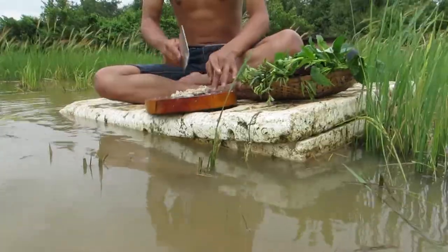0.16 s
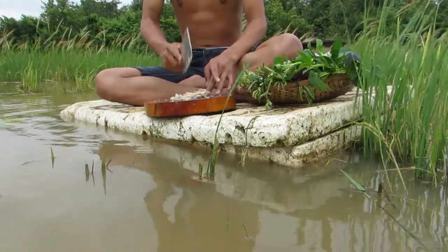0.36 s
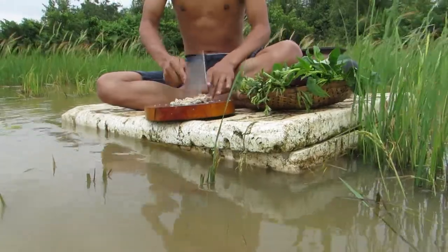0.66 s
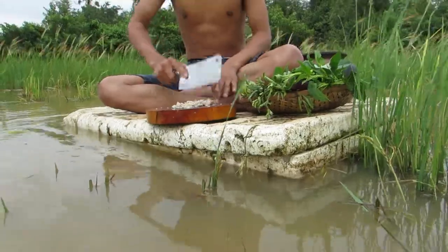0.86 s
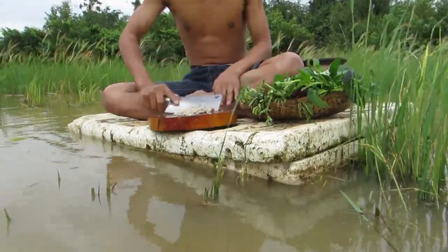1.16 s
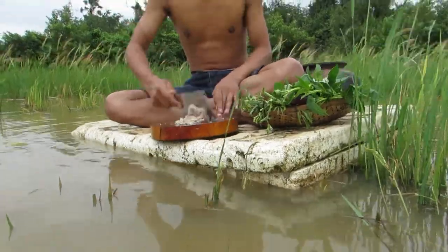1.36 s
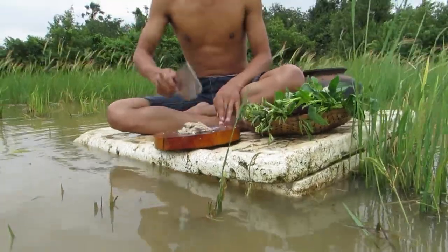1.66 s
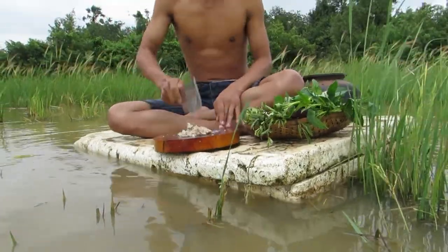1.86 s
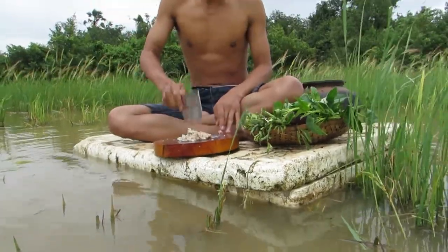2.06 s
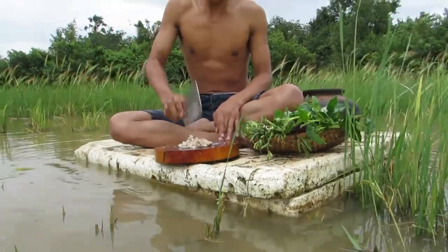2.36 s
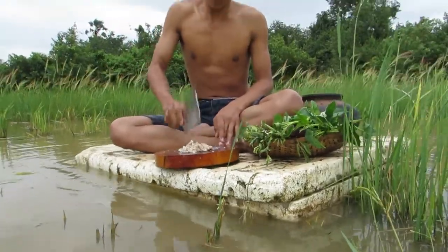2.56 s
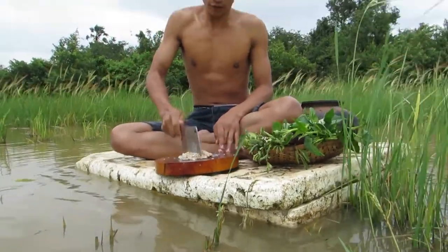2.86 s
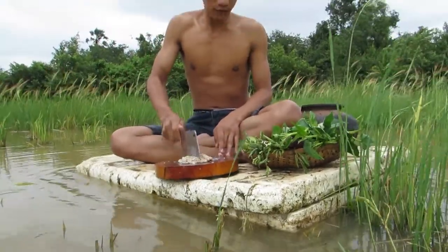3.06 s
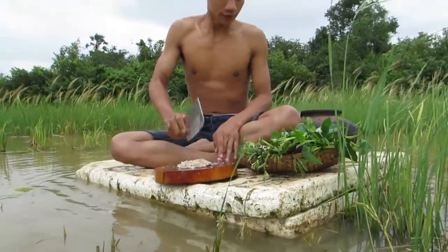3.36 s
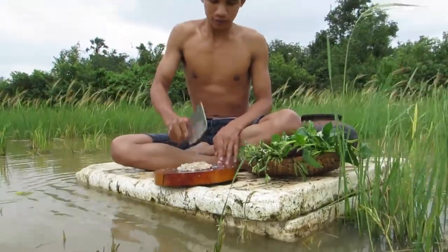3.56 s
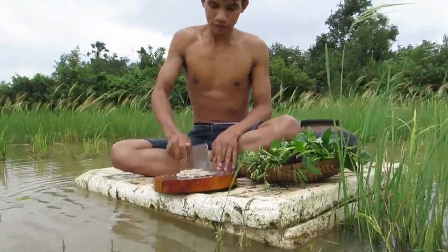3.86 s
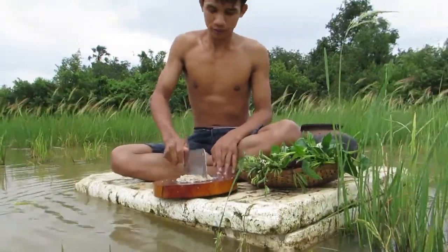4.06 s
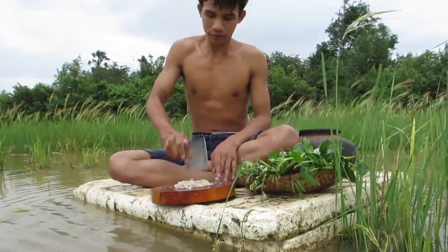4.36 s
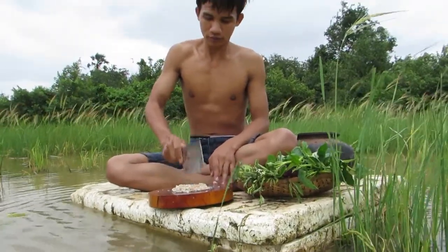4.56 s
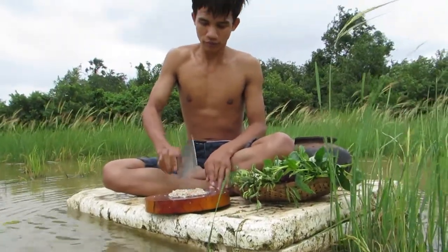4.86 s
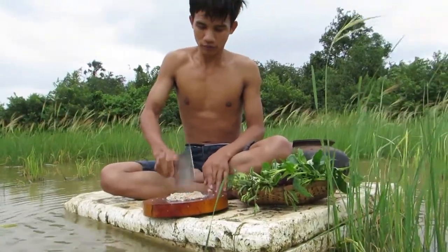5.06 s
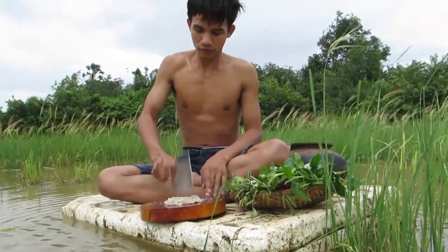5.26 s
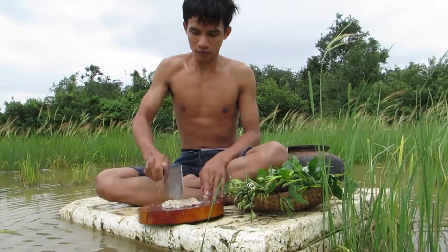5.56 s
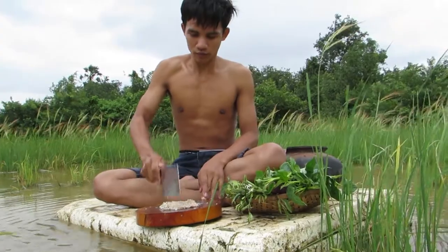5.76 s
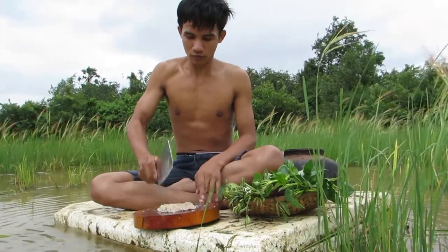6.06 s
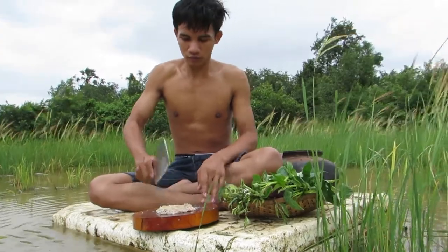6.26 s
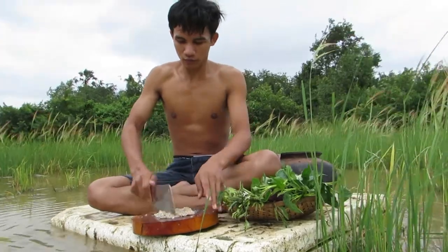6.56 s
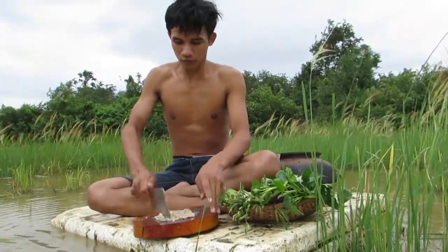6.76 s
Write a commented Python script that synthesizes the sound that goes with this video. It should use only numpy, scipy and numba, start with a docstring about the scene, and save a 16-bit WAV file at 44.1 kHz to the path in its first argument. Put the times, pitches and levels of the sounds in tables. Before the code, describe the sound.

Outdoors at a reedy pond, a small stereo camera a few metres away hears a cleaver on a wooden block. Four blows fall from 0 to 0.7 s, each a short woody knock with a bright crack, faint food crunch and low hollow thump from the foam raft. At about 1 s the blade scoops with a gritty clatter and drags briefly, hissing with a slight steel ring. Faint ticks and four raspy cricket chirps come around 1.4-1.6 s, then a soft scoop at 1.77 s. From 2 s chopping continues to the end, nearly five blows a second, varying in force, hardest near 2.4 s and generally lighter after 5 s. Low wind buffets, strongest around 2.5-3.4 s, with reed hiss, hollow drone, distant engine hum and a very thin high whine. Automatic gain ducks at hard, clipped hits and lifts the background in gaps.

```python
"""A reedy pond, a small camera's two microphone ports a few metres from a wooden block on a foam raft.
Four cleaver blows ring block and raft; from 1 s blade scoops food and drags; ticks and a cricket follow.
Chopping returns at 2 s and runs to the end. Noise bands make wind on the ports, reeds and a hollow drone;
wavering tones make a far engine and a thin high whine. Wind is strongest at 2.5-3.4 s, weaker after 5 s.
Gain control drops at hard blows and creeps back, so the background swells whenever the chopping eases."""
import sys
import numpy as np
from scipy import signal
from scipy.io import wavfile
from scipy.ndimage import uniform_filter1d
from numba import njit

SR = 44100
rng = np.random.default_rng(int(sys.argv[2]) if len(sys.argv) > 2 else 0)


def materialize(psi):
    """Save the field psi as 16-bit PCM at rate SR to the path in sys.argv[1].

    A 1-D psi becomes a single channel; in a 2-D psi each row is a channel.
    """
    bounded = np.clip(np.atleast_2d(psi).T, -1, 1)
    quanta = np.round(bounded * 32767).astype(np.int16)
    wavfile.write(sys.argv[1], SR, quanta)


N = 304731  # length in samples

# All levels stand ahead of the gain control; "side" is left minus right.
# Cleaver blows [t/s, level/dB, then against the block's main ring: raft/dB, knock/dB, upper ring/dB]
BLOWS = [(0.005, -11.5, -5, -8, -15.5), (0.2341, -11.5, -9, -7, -16), (0.453, -4.5, -21.5, -8.5, -14.5),
         (0.684, -14.5, -6.5, -12.5, -12), (1.9847, -7.5, -10.5, -11.5, -8.5),
         (2.2028, -12, -7.5, -14.5, -9.5), (2.4113, -1, -21, -14.5, -13.5), (2.6163, -23, -6, -9, -19),
         (2.8156, -3.5, -17, -11.5, -14.5), (3.0301, -8, -15.5, -21.5, -17), (3.2419, -19, -5, -15.5, -7.5),
         (3.4526, -7.5, -16.5, -16, -19.5), (3.6583, -8.5, -11, -16, -13.5), (3.8634, -4, -15.5, -19, -14),
         (4.0742, -15, -11, -11.5, -16), (4.2849, -23, -1.5, -10, -9), (4.495, -10.5, -8, -15.5, -12),
         (4.6995, -8.5, -12, -19, -11.5), (4.9079, -7.5, -12, -19, -15.5), (5.113, -14, -7, -11, -11),
         (5.318, -9, -13, -18, -12), (5.5162, -18.5, -9.5, -13, -17.5), (5.7245, -13, -15.5, -17, -16),
         (5.9384, -14.5, -16.5, -14, -13.5), (6.1515, -14, -17, -16, -12.5), (6.3673, -20, -15.5, -18, -11),
         (6.5812, -14, -28, -17, -14), (6.8021, -15.5, -22, -14.5, -12.5)]
# Ringing modes, before each blow's detuning [f/Hz, level/dB, t60/s, swell/s, arrival/s, side/dB]:
# the block's main ring
BLOCK_MODES = [(1290, 12, .0145, .002, .00194, 1), (1080, -5, .012, .0015, .0006, 0),
               (1520, -6, .010, .002, .002, 0), (1860, -14, .012, .001, .0002, 0)]
# the knock of the heel
KNOCK_MODES = [(765, 9, .02, .0009, .0001, -1), (600, -1, .012, .001, .0003, -1),
               (920, -3, .01, .001, .0003, 0), (400, -3, .02, .001, .0005, 0)]
# the upper ring of the wood
UPPER_MODES = [(2897, 9.5, 0.017, 0.0014, 0.000336, 0.01), (2304, 0.5, 0.015, 0.0012, 0.00026, 0.061),
               (3138, 11.5, 0.013, 0.0021, 0.000283, 0.0083), (3728, -5.5, 0.02, 0.0011, 0.000328, 0),
               (4190, -3, 0.0054, 0.00028, 0.000094, 0.019)]
# the foam raft
RAFT_MODES = [(144.9, 0, 0.066, 0.0028, 0.0046, -2.2), (223, -1, 0.059, 0.0058, 0.0025, -2.5),
              (314.5, 3, 0.053, 0.0046, 0.003916, -2), (347.4, -1, .03, 0.0016, 0.00278, -1),
              (407, -3, 0.028, .002, 0.00386, -0.16)]
# Broad resonances of the crack [f/Hz, width/Hz, level/dB]
CRACK_BANDS = [(4930, 1910, -1.5), (6210, 1310, -7), (7500, 860, -0.5), (9090, 2090, 0), (10460, 2730, -6),
               (12640, 2400, -19)]
# Echoes off water and reeds [f/Hz, width/Hz, level/dB]
SCATTER_BANDS = [(710, 524, 6.5), (1295, 270, 5.5), (2865, 4000, -15.5), (5400, 7100, -30)]
# The edge wanders over the block [t/s, pitch factor]
BLOCK_PITCH_CURVE = [(0, 1.052), (.7, 1.018), (2, 0.998), (3, 0.995), (6.9, 1.016)]
# The camera drifts past the raft [t/s, side/dB]
CHOP_PAN_CURVE = [(0, 4), (2, 2), (6.9, 3)]
# Scoops under the heap
# [clatter t/s, gritty level/dB, woody level/dB, woody delay/s, raft push t/s, raft level/dB]
SCOOP_EVENTS = [(0.9718, -25, -29.5, 0.00205, .9695, -24), (1.7686, -40, -40.5, .005, 1.770, -25.5)]
# Steel modes of the blade [f/Hz, level/dB, t60/s]
STEEL_MODES = [(1540, -12, .3), (2350, -2, .09), (3550, 0, .07), (4100, -2, .06), (4500, -4, .05),
               (5280, -6, .04), (6500, -6, .04)]
# The flat of the blade touches the block [t/s, level/dB]
FLAT_TAPS = [(.975, -44), (1.052, -53)]
# Bright little ticks [t/s, level/dB]
TICK_EVENTS = [(1.428, -56), (1.561, -46), (1.588, -45), (1.5929, -43)]
# Hollow band of noise [t/s, level/dB]
DRONE_CURVE = [(0, -66), (1, -72.5), (2, -58), (3.5, -66), (5, -67.5), (5.8, -62.5), (6.5, -65.5),
               (6.91, -70)]
# Spectrum of wind and reeds, relative [f/Hz, density level/dB]
OUTDOOR_SPECTRUM = [(15, -35), (25, -4.5), (69, 4), (228, -5.5), (455, -18), (506, -20.5), (934, -22),
                    (1820, -33.5), (3440, -36.5), (3930, -41.5), (6020, -43.5), (8070, -49), (8980, -51),
                    (13400, -57), (14500, -69)]
# Correlation between left and right outdoors [f/Hz, likeness 0-1]
LIKENESS = [(30, 0.09), (70, 0), (130, 0.89), (290, 0.4), (640, 0.02), (15000, 0.15)]
# Wind against the spectrum [t/s, level/dB]
WIND_CURVE = [(0, 4), (.6, 0), (1.5, -0.5), (2.5, 4), (3, 1), (3.4, 5.5), (3.9, -0.5), (4.3, 0), (5, -6.5),
              (6.5, -11), (6.91, -6)]
# Reeds against the spectrum [t/s, level/dB]
REEDS_CURVE = [(0, 5.5), (.5, 3.5), (2, 4.5), (3.5, 3.5), (4.2, 1), (6.91, -5)]
# Upper partial of the engine, which comes and goes [t/s, level/dB]
ENGINE_UPPER_CURVE = [(0, -41.5), (.5, -44.5), (1, -57.5), (2.5, -66), (5, -59), (5.9, -62.5), (6.2, -50.5),
                      (6.91, -52)]
# Notches of the microphone ports [f/Hz, width/Hz, depth 0-1]
PORT_NOTCHES = [(3970, 300, .6), (7850, 200, .75)]

# crack against the upper ring; softer blows crack more for their size
CRACK_DB, CRACK_DB_PER_BLOW_DB = -4, -0.53
CRACK_RISE_S, CRACK_FALL_S = .0015, .0025
FOOD_DB, FOOD_SPREAD_DB = -42, 3  # the crunch does not follow the force of the blow
RAFT_SPREAD_DB = 2.5
SCRAPE_START_S, SCRAPE_DB, SCRAPE_SAG_DB = 1.024, -52.5, -5
SCRAPE_ATTACK_S, SCRAPE_HOLD_S, SCRAPE_RELEASE_S = 0.042, 0.066, 0.096  # release: time to fall 20 dB
CHIRP_HZ, CHIRP_DB, CHIRP_RISE_S, CHIRP_FALL_S = 4650, -60, .004, .006
CHIRP_START_S, CHIRP_GAP_S = 1.4443, .0495
WHINE_HZ, WHINE_SAG_HZ_PER_S, WHINE_WAVER_HZ = 8692, -29, 6
WHINE_DB, WHINE_FADE_DB_PER_S = -82, -.7
DRONE_HZ, DRONE_WIDTH_HZ = 1010, 114
MURMUR_HZ, MURMUR_WIDTH_HZ, MURMUR_DB = 318.4, 52, -64.5
OUTDOORS_DB = -70.5
ENGINE_HZ, ENGINE_LOW_DB, ENGINE_WAVER = 118.7, -54, .005  # waver as a share of the pitch
GAIN_START, GAIN_CLIMB_PER_S, GAIN_MAX = 11.4, 9.93, 18  # gains are factors
GAIN_TOP, GAIN_ATTACK_S, GAIN_HOLD_S = 0.9, 0.0019, 0.027  # peak ceiling, time constants
TOP_HZ = 16100


def undb(db):
    """Amplitude factor of a level in dB."""
    return 10 ** (np.asarray(db) / 20)


def unit(x):
    """Scale to an RMS of 1."""
    return x / np.sqrt(np.mean(x ** 2))


def band(x, hz, width):
    """Band-pass around hz."""
    edges = np.clip([hz - width / 2, hz + width / 2], 10, .45 * SR)
    return signal.sosfilt(signal.butter(2, edges, "band", fs=SR, output="sos"), x)


def walk(rate):
    """Random levels held 1 / rate s and slewed twice; spread near 1."""
    hold = int(SR / rate)
    steps = np.repeat(rng.standard_normal(N // hold + 1), hold)
    return 1.222 * uniform_filter1d(uniform_filter1d(steps, hold), hold)[:N]


def curve(points):
    """Straight lines through (t/s, value) points."""
    return np.interp(np.arange(N) / SR, *np.transpose(points))


def add(out, s, x):
    """Mix x in at s seconds."""
    i = int(s * SR)
    a, b = max(i, 0), min(i + x.shape[-1], N)
    out[:, a:b] += x[..., a - i:b - i]


def pan(db):
    """Left and right factors that differ by db."""
    return undb(np.array([[db], [-db]]) / 2)


def ring(modes, detune, spread_db=0., right_lag_s=.00005):
    """Modes swell as the blow sinks in and die away; the first push points away from the microphone."""
    out = 0
    for hz, db, t60, swell, arrival, side_db in modes:
        t = np.maximum(np.arange(4000) / SR - arrival - np.array([[0], [right_lag_s]]), 0)
        shape = (1 - np.exp(-t / swell)) * np.exp(-np.log(1000) * t / t60)
        size = undb(db + spread_db * rng.standard_normal())
        out = out - size * pan(side_db) * shape * np.sin(2 * np.pi * hz * detune * t)
    return out


def burst(bands, rise, fall):
    """A short puff of noise through broad resonances, a little late and duller at the right port."""
    t = np.arange(2000) / SR
    puff = rng.standard_normal(2003)
    shared = np.array([puff[3:], (puff[2:-1] + puff[1:-2]) / 2])
    noise = shared + .5 * rng.standard_normal((2, 2000))
    tone = 0
    for hz, width, db in bands:
        tone = tone + undb(db) * band(noise, hz, width) / np.sqrt(2 * width / SR)
    return tone * (1 - np.exp(-t / rise)) * np.exp(-t / fall)


def chops():
    """Food crunches, the heel knocks, the whole edge lands; block and raft ring, the pond scatters it."""
    out = np.zeros((2, N))
    for s, db, raft_db, knock_db, upper_db in BLOWS:
        place = pan(np.interp(s, *np.transpose(CHOP_PAN_CURVE)))
        size = undb(db) * place
        crack_db = upper_db + CRACK_DB + CRACK_DB_PER_BLOW_DB * (db + 7.5)
        food_db = FOOD_DB + FOOD_SPREAD_DB * rng.standard_normal()
        detune = 1 + .006 * rng.standard_normal(4)
        pitch = np.interp(s, *np.transpose(BLOCK_PITCH_CURVE))
        detune[:2] *= pitch ** np.array([1, 2])  # the knock shifts more than the main ring

        wood = ring(BLOCK_MODES, detune[0], 1)
        wood = wood + undb(knock_db) * ring(KNOCK_MODES, detune[1], 0.77)
        wood = wood + undb(upper_db) * ring(UPPER_MODES, detune[2] ** 4, 2.)
        raft = undb(raft_db) * ring(RAFT_MODES, detune[3], RAFT_SPREAD_DB)
        crack = undb(crack_db) * burst(CRACK_BANDS, CRACK_RISE_S, CRACK_FALL_S)
        crunch = undb(food_db) * burst([(3000, 2500, 0)] + CRACK_BANDS, .005, .003)
        echo = undb(-22.5) * burst(SCATTER_BANDS, 0.0012, 0.0066)
        add(out, s, size * (wood + raft))
        add(out, s, size * crack)
        add(out, s - .006, place * crunch)  # the edge meets the food first
        add(out, s + 0.00166, size * echo)
    return out


def scoops():
    """The blade slides under the food with a gritty, then woody clatter and rocks the raft."""
    out = np.zeros((2, N))
    for s, grit_db, wood_db, delay, push_s, raft_db in SCOOP_EVENTS:
        add(out, s, undb(grit_db) * burst([(3100, 1750, 1.3)] + CRACK_BANDS, 0.0029, 0.0049))
        add(out, s + delay, undb(wood_db) * burst(SCATTER_BANDS, 0.0033, 0.0049))
        add(out, push_s, undb(raft_db) * ring(RAFT_MODES, 0.922))
    return out


def blade():
    """Stick-slip clicks of the dragged edge and light taps ring the steel; the drag also hisses."""
    since = np.arange(N) / SR - SCRAPE_START_S
    held = np.clip((since - SCRAPE_ATTACK_S) / SCRAPE_HOLD_S, 0, 1)
    after = np.maximum(since - SCRAPE_ATTACK_S - SCRAPE_HOLD_S, 0)
    release = np.exp(-after * np.log(10) / SCRAPE_RELEASE_S)
    attack = np.clip(since / SCRAPE_ATTACK_S, 0, 1) ** 2
    drag = undb(SCRAPE_DB + SCRAPE_SAG_DB * held) * attack * release
    slip_db = 3.0 * rng.exponential(size=N) + 2 * walk(70)
    slips = drag * rng.standard_normal((2, N)) * undb(slip_db)

    force = undb(-39.5) * slips[0]
    for s, db in FLAT_TAPS:
        force[int(s * SR)] += undb(db)
    t = np.arange(12000) / SR
    steel = 0
    for hz, db, t60 in STEEL_MODES:
        steel = steel + undb(db) * np.exp(-np.log(1000) * t / t60) * np.sin(2 * np.pi * hz * t)
    hiss = band(slips, 4500, 5200) + 0.19 * band(slips, 8400, 4500)
    return signal.fftconvolve(force, steel)[:N] + hiss


def ticks():
    """Bright little ticks: very short puffs of high noise."""
    out = np.zeros((2, N))
    for s, db in TICK_EVENTS:
        add(out, s, undb(db) * burst([(9600, 2900, 0)], 0.0003, 0.00086))
    return out


def cricket():
    """Four evenly spaced raspy chirps, each a puff of narrow-band noise."""
    out = np.zeros((2, N))
    for k in range(4):
        chirp = burst([(CHIRP_HZ, 250, 0)], CHIRP_RISE_S, CHIRP_FALL_S)
        add(out, CHIRP_START_S + k * CHIRP_GAP_S, undb(CHIRP_DB) * chirp)
    return out


def whine():
    """A thin high whine, probably the camera's: one wavering sine that slowly sinks in pitch and level."""
    t = np.arange(N) / SR
    hz = WHINE_HZ + WHINE_SAG_HZ_PER_S * t + WHINE_WAVER_HZ * walk(3)
    flicker_db = 2 * np.array([walk(50), walk(60)])  # separate at each port
    level = undb(WHINE_DB + WHINE_FADE_DB_PER_S * t + flicker_db)
    return level * np.sin(2 * np.pi * np.cumsum(hz) / SR)


def drone():
    """A hollow band of noise, stronger at left, over a lower murmuring band in the middle."""
    hollow = unit(band(rng.standard_normal((2, N)), DRONE_HZ, DRONE_WIDTH_HZ)) * pan(4)
    murmur = unit(band(rng.standard_normal(N), MURMUR_HZ, MURMUR_WIDTH_HZ))
    murmur = undb(MURMUR_DB + 2 * walk(1.8)) * murmur
    return murmur + hollow * undb(curve(DRONE_CURVE) + 0.84 * walk(18))


def outdoors(wind_db, reeds_db):
    """Noise bands a quarter octave apart: gusty wind on the ports below, smoother reeds above."""
    out, gust = 0, walk(3.16)
    spectrum_hz, spectrum_db = np.transpose(OUTDOOR_SPECTRUM)
    alike_hz, alike_share = np.transpose(LIKENESS)
    for hz in 25 * 2 ** np.arange(0, 9.2, 1 / 4):
        mid, side = band(rng.standard_normal((2, N)), hz, hz / 5) * np.sqrt(SR / 2)
        alike = np.clip(np.interp(np.log(hz), np.log(alike_hz), alike_share), 0, 1)
        stereo = np.sqrt(1 + alike) * mid + np.sqrt(1 - alike) * side * np.array([[1], [-1]])
        windy = 1 / (1 + (hz / 400) ** 3)  # wind's share of the level changes
        db = np.interp(np.log(hz), np.log(spectrum_hz), spectrum_db)
        db = db + windy * (wind_db + 2.04 * gust + 2.7 * walk(11))
        db = db + (1 - windy) * (reeds_db + 1.6 * walk(14))
        out = out + undb(db) * stereo * pan(2.4)
    return out * undb(OUTDOORS_DB)


def engine(upper_db):
    """A far engine: two wavering partials an octave apart."""
    phase = 2 * np.pi * np.cumsum(ENGINE_HZ * (1 + ENGINE_WAVER * walk(8))) / SR
    upper = undb(upper_db + 2.9 * walk(12.0)) * np.sin(2 * phase)
    low = undb(ENGINE_LOW_DB + 2 * walk(13)) * np.sin(phase)
    return upper + low


def scene():
    """Raft in front, then ticks, cricket, whine and drone, then wind, reeds and the far engine."""
    near = chops() + scoops() + blade()
    faint = ticks() + cricket() + whine() + drone()
    background = outdoors(curve(WIND_CURVE), curve(REEDS_CURVE)) + engine(curve(ENGINE_UPPER_CURVE))
    return near + faint + background


@njit
def gain_control(peak, gain, climb, most, top, attack, hold):
    """The gain falls fast towards what the held peak allows, else it climbs in even steps."""
    out, held = np.empty(len(peak)), 1e-9
    for i in range(len(peak)):
        held = max(peak[i], held * hold)
        if gain * held > top:
            gain += attack * (top / held - gain)
        else:
            gain = min(gain + climb, most)
        out[i] = gain
    return out


def record(dry):
    """Port notches; gain control, too slow to stop the blows from clipping; then the top is cut."""
    for hz, width, depth in PORT_NOTCHES:
        dry = dry - depth * signal.lfilter(*signal.iirpeak(hz, hz / width, fs=SR), dry)
    peak = np.abs(dry).max(axis=0)  # the louder port steers both
    attack, hold = 1 / (GAIN_ATTACK_S * SR), np.exp(-1 / (GAIN_HOLD_S * SR))
    gain = gain_control(peak, GAIN_START, GAIN_CLIMB_PER_S / SR, GAIN_MAX, GAIN_TOP, attack, hold)
    clipped = np.clip(dry * gain, -1, 1)
    top_cut = signal.ellip(8, .2, 60, TOP_HZ, fs=SR, output="sos")
    return np.clip(signal.sosfilt(top_cut, clipped), -1, 1)


dry = scene()
out = record(dry)
materialize(out)
```